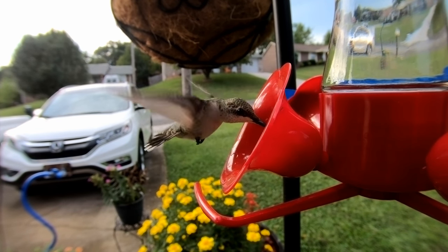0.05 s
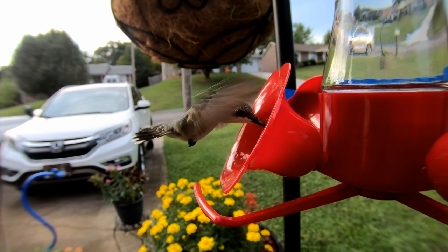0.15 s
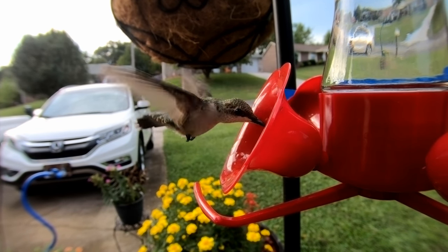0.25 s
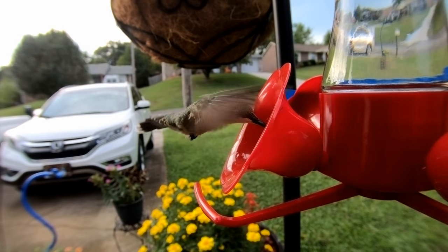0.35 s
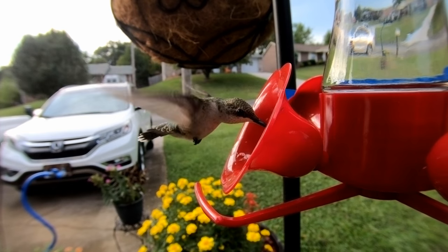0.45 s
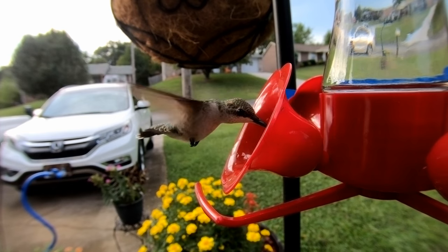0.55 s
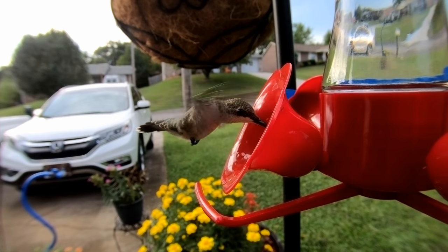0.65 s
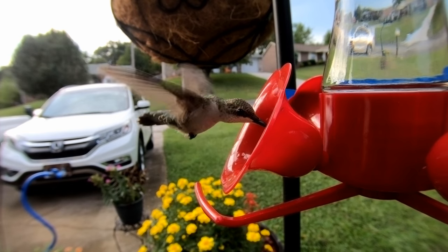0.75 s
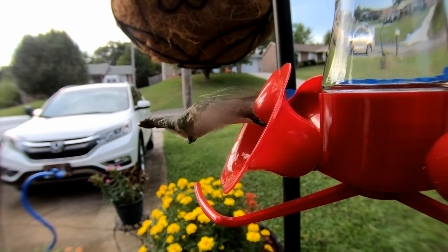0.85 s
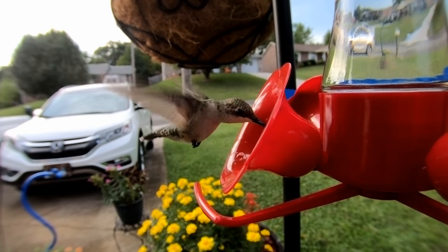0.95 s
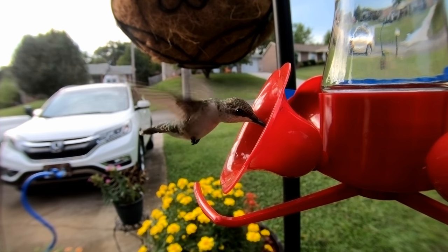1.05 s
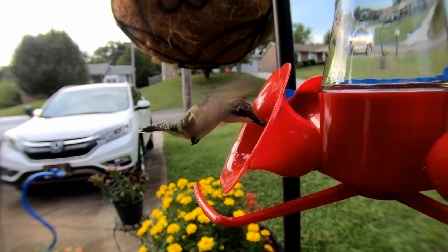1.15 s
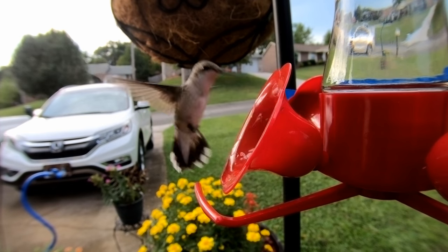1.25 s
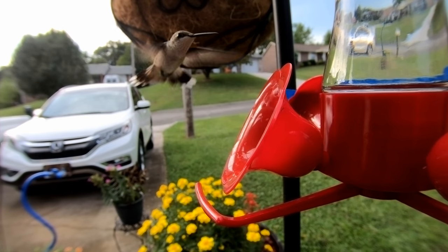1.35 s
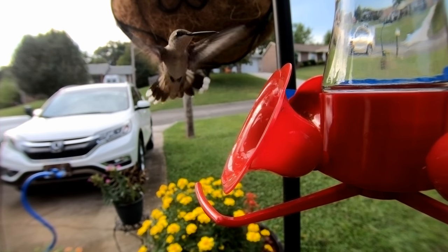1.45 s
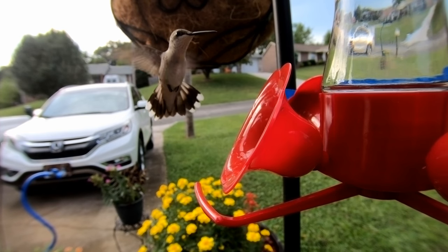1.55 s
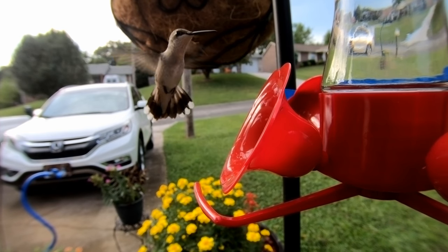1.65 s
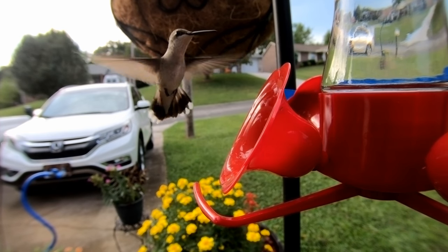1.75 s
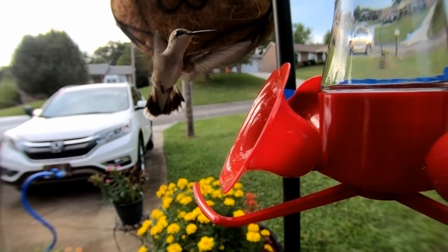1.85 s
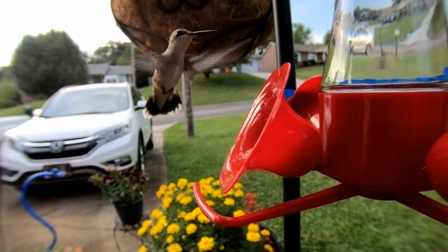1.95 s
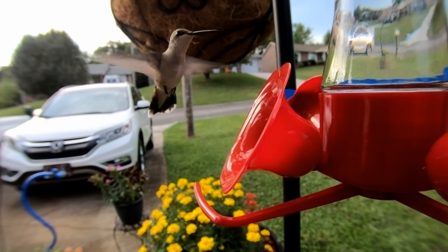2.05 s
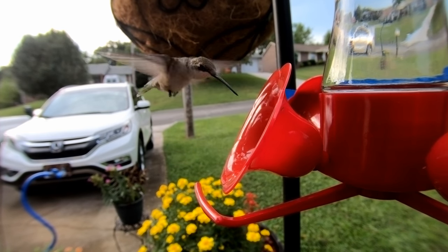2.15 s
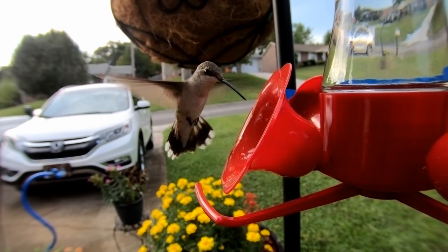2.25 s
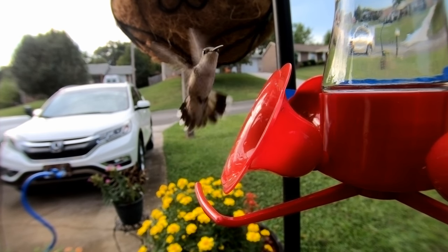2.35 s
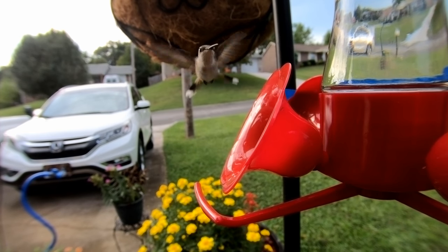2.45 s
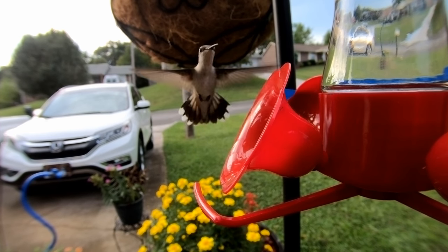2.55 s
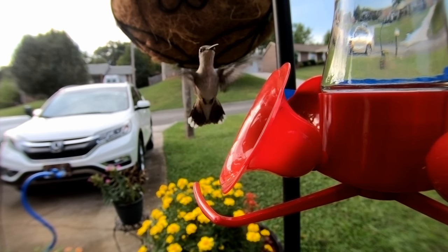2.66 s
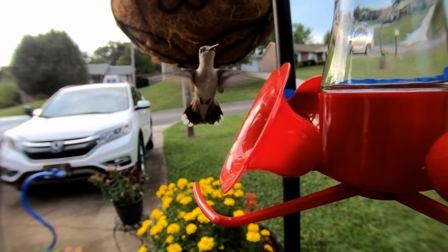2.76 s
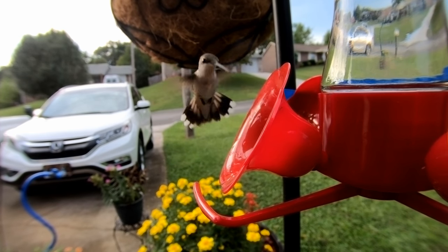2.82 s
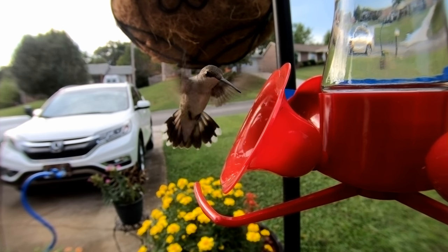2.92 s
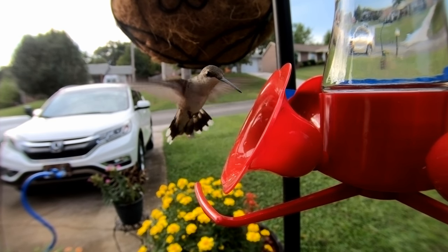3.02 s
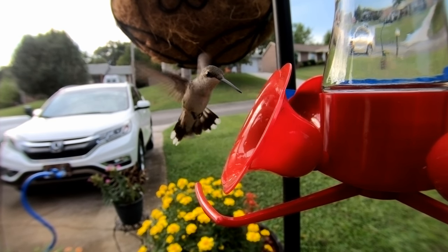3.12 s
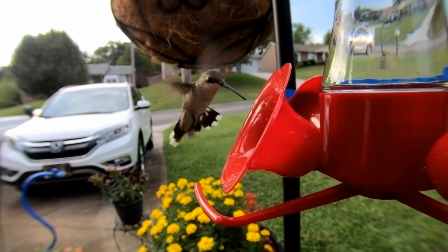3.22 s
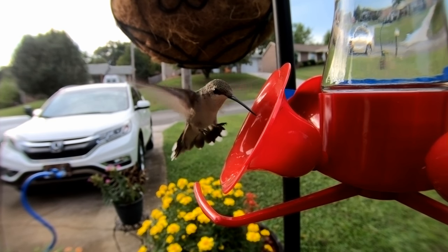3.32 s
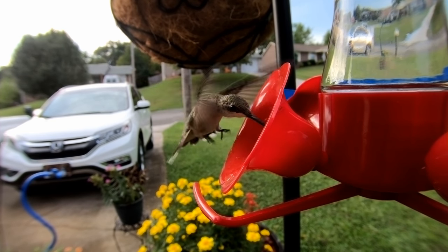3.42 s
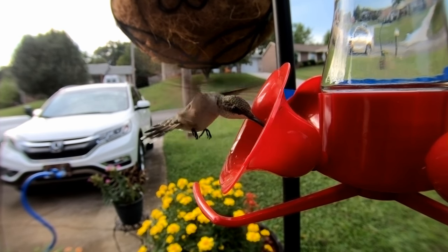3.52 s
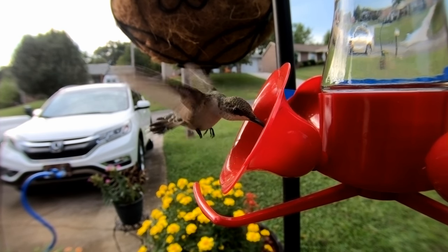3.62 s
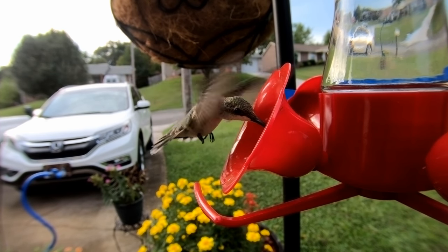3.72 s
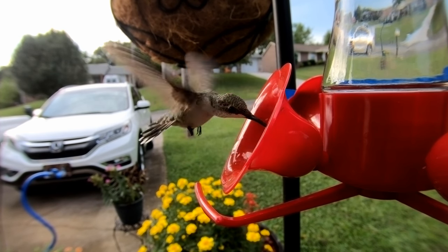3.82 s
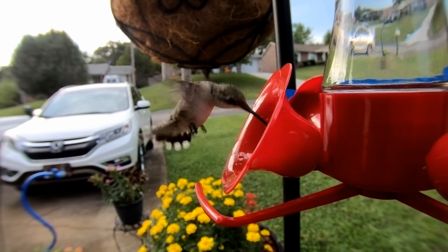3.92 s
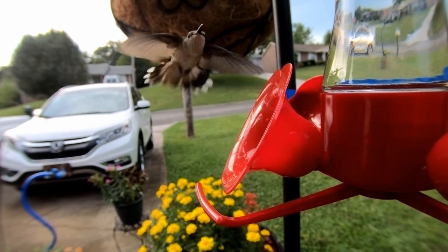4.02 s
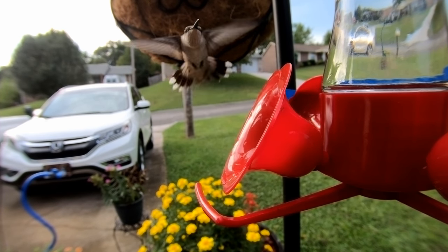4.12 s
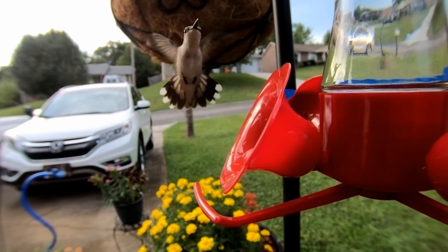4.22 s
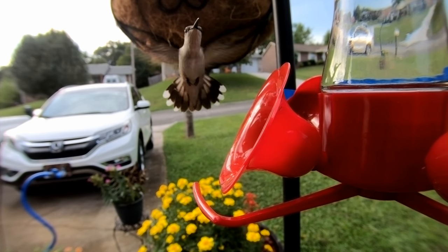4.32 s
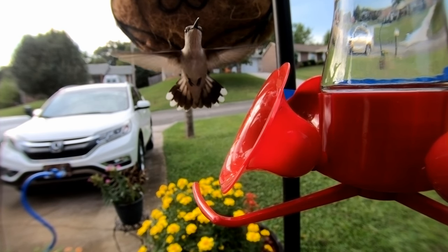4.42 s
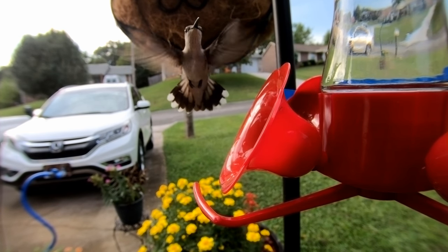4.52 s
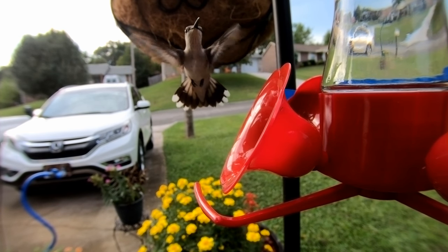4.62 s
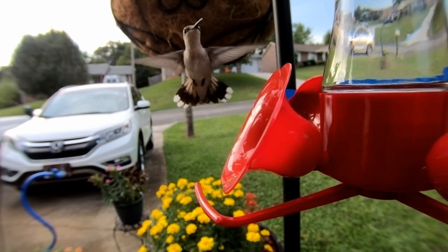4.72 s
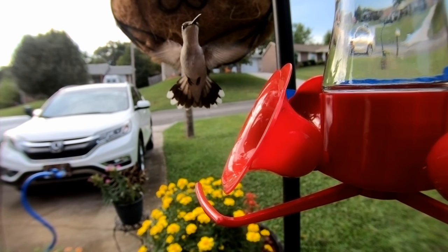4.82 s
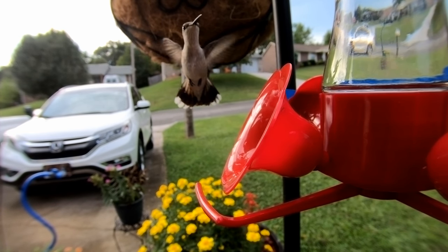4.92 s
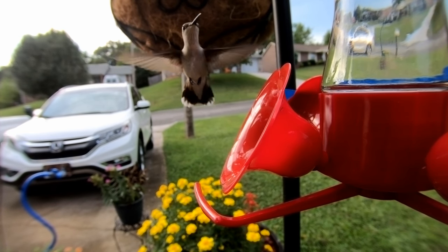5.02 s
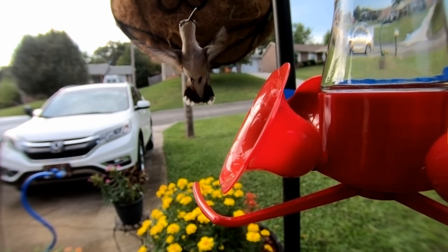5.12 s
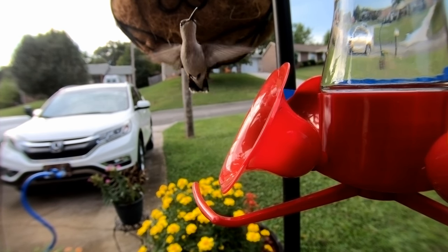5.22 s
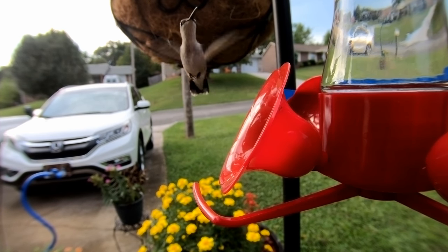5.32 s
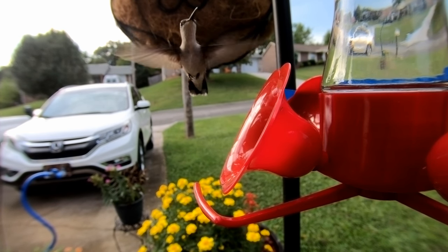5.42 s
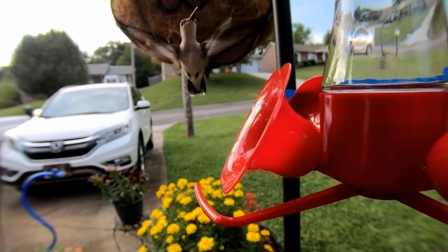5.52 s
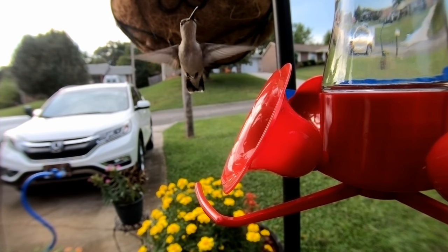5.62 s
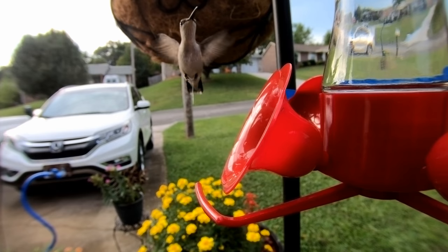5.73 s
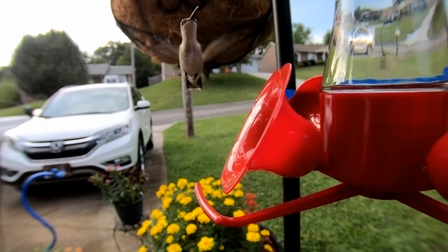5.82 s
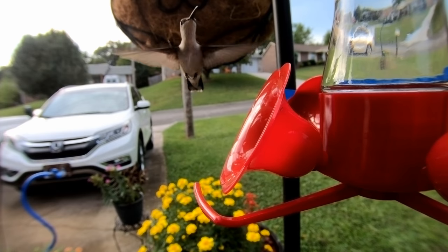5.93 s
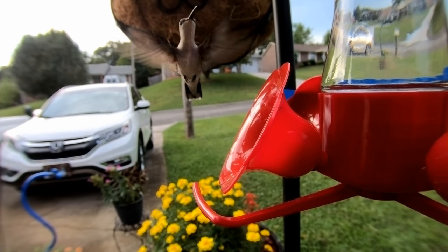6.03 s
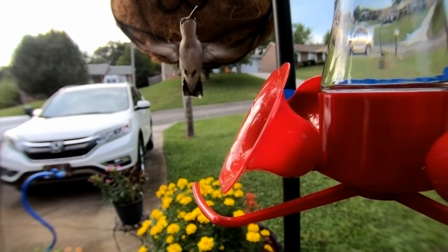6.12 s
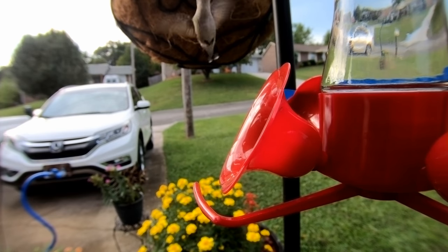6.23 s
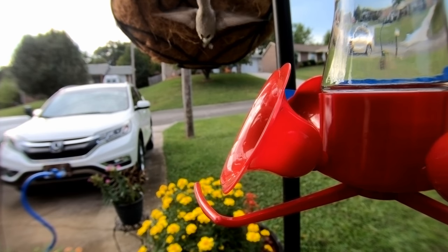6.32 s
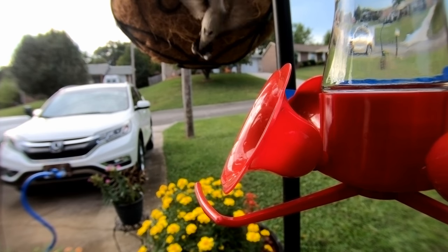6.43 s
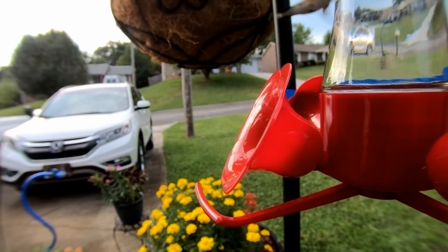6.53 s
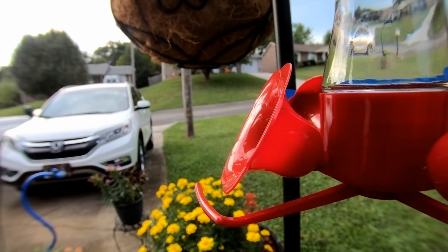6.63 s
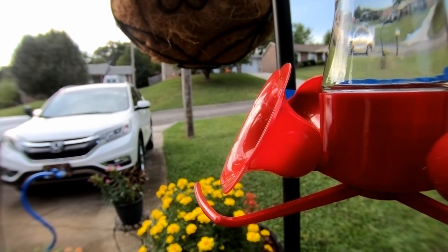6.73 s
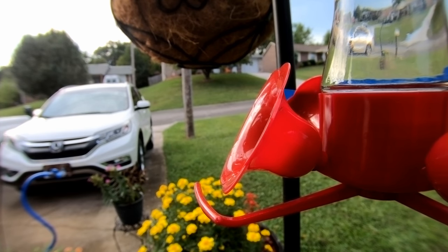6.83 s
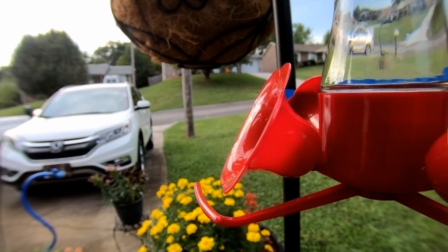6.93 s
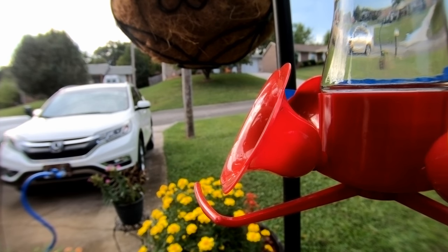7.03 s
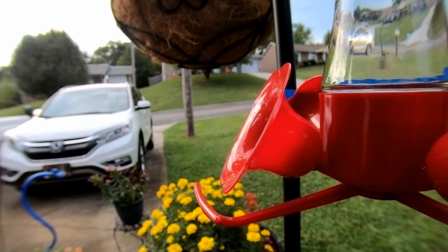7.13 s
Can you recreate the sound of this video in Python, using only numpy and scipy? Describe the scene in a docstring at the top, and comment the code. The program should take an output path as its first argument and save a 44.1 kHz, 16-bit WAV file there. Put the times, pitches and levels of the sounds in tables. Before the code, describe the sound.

A hummingbird's wings hum low and fluttering from the start, a hand's width from the microphone, with a soft pulsing swish. The hum is steady and slightly rough while the bird feeds, then surges louder and higher as it darts at about 1.3, 2.1, 2.4, 3.1, 4.1 and 6.3 seconds, mostly dipping briefly afterwards. It gives faint, thin rising chips around 0.7, 1.1, 2.3 and 4.9 seconds. Wing air softly buffets the microphone near 2.1 and 6.6 seconds. From about 6.2 seconds feathers lightly brush, bump and scrape a fibre basket. The hum dies away quickly just after 6.7 seconds, leaving a faint rustle. Far quieter throughout is the open garden: distant traffic, a steady high insect chorus, a far bird's repeated call and small scattered peeps. A distant dog gives one short woof at about 4.9 seconds.

```python
"""The hum of a hummingbird's wings at a garden feeder, a hand's width from a stereo microphone.
Every wingbeat is a pressure pulse with a swish. The bird sips, gives a few thin chips and darts back
and forth, its downwash buffeting the microphone; on the way out its feathers brush a fibre basket.
Farther off: insects, traffic, a bird's repeated call, small peeps and one distant woof."""
import sys
import numpy as np
from scipy import signal
from scipy.fft import rfft, irfft, next_fast_len
from scipy.io import wavfile
from scipy.ndimage import uniform_filter1d, map_coordinates

SR = 44100
rng = np.random.default_rng(int(sys.argv[2]) if len(sys.argv) > 2 else 0)


def to_wav(sig):
    """Store sig (one row per channel, or 1-D mono) as 16-bit WAV at the path in sys.argv[1].

    Samples outside -1..1 are clipped; the rate is SR.
    """
    pcm = np.clip(np.atleast_2d(sig), -1, 1) * 32767
    pcm = np.round(pcm).astype(np.int16)
    wavfile.write(sys.argv[1], SR, pcm.T)  # frames by channels


N = 316197

# steady hovering close to the microphone: time_s, beat_hz, level_db
HOVER = [(0.0, 44.82, -17.3), (0.26, 46.15, -19.2), (0.5, 43.73, -19.5), (0.84, 44.25, -19.5),
         (1.27, 42.53, -18.5), (1.62, 44.56, -15.3), (1.77, 41.11, -16.8), (2.05, 42.3, -18.7),
         (2.28, 45.6, -14.1), (2.62, 43.46, -19.0), (2.9, 39.68, -19.8), (3.35, 42.74, -17.5),
         (3.53, 47.88, -14.2), (3.95, 45.37, -17.7), (4.55, 40.84, -15.9), (5.3, 42.78, -17.9),
         (6.15, 41.23, -17.4), (6.59, 44.18, -21.4)]
# how far the bird lies flat with its bill in the feeder: time_s, feeding (0-1)
FEEDING = [(0, 0.94), (1.2, 1), (1.6, 0.3), (2.5, 0.3), (3.2, 0.3), (3.7, 0.9), (4.3, 0.01)]
# a burst of effort, then a coasting lull: peak_s, effort (1 = hard dart), lull_delay_s, lull_depth_db
DARTS = [(1.347, 0.79, 0.166, 9.6), (2.109, 0.67, 0.154, 4.9), (2.431, 0.88, 0.098, 15.2),
         (3.06, 0.71, 0.1, 0.0), (3.428, 0.41, 0.058, 0.7), (4.078, 1.22, 0.112, 8.7),
         (6.274, 0.78, 0.096, 15.4), (6.544, 0.46, 0.07, 0.4)]
# air tearing off the feathers: frequency_hz, density_db
SWISH_SPECTRUM = [(60, -8.5), (150, 0.5), (300, -6), (500, -14), (800, -18.5), (1500, -30), (3000, -34.5),
                  (7000, -44), (9000, -54), (15000, -70.5)]
# eddies stirred by the wings: frequency_hz, density_db
EDDY_SPECTRUM = [(40, -25.5), (70, 3.5), (120, 1.5), (170, -15), (300, -37), (900, -81)]
# open garden air with far traffic: frequency_hz, density_db
GARDEN_SPECTRUM = [(20, 12.5), (60, 16.5), (150, 8.5), (300, -7), (700, -8), (1300, -12), (2000, -19.5),
                   (2600, -25), (4500, -25.5), (7000, -36.5), (8300, -42), (11000, -42.5), (15000, -53.5)]
# the insect chorus all around: frequency_hz, density_db
INSECT_SPECTRUM = [(2000, -44.5), (2700, -10), (3400, 1.5), (4300, -6), (4900, -1.5), (5700, -4),
                   (6300, -2), (6800, 4), (7200, -2), (7600, -8.5), (8200, -28), (11000, -55)]
# stacked notes of the far bird's call: delay_s, pitch_hz, level_db, length_s
CALL_NOTES = [(0, 3875, 1, .075), (.03, 3700, -1, .17), (.03, 3300, -2.5, .18), (.02, 4080, -6, .14),
              (.04, 2920, -8, .15)]
# the clearest peeps across the garden: peak_s, level_db, pitch_hz
PEEPS = [(.19, -60, 2740), (.35, -59.5, 2550), (.412, -52.5, 1530), (.5, -51.5, 930), (.81, -51, 1000),
         (.998, -47, 1010), (1.67, -51, 954), (1.79, -54.5, 2000), (1.975, -51, 3190), (2.328, -55.5, 2030),
         (2.365, -52.5, 1650), (3.226, -53.5, 3020), (3.49, -58.5, 3400), (3.557, -54.5, 3250),
         (3.665, -54, 1900), (3.715, -56.5, 2900), (4.338, -63, 2010), (5.1, -51.5, 1510),
         (5.472, -50.5, 2060)]
# feathers brushing and flicking close by: start_s, level_db, centre_hz, t60_s
BRUSHES = [(0.677, -54, 2200, 0.2), (0.793, -51, 1200, 0.23), (1.089, -54, 2000, 0.12),
           (2.075, -51, 1800, 0.48), (2.572, -59, 2480, 0.073), (4.034, -55.5, 2000, 0.058),
           (4.209, -52.5, 1570, 0.12), (5.138, -49.5, 1700, 0.12), (5.988, -49.5, 1500, .08),
           (6.191, -40, 3500, 0.062), (6.219, -48.5, 4800, 0.13), (6.323, -46.5, 2510, 0.13),
           (6.377, -48, 6600, 0.08), (6.495, -38, 3850, 0.077), (6.522, -48.5, 3070, 0.17),
           (6.573, -47, 1020, 0.067), (6.649, -41, 2360, 0.053), (6.707, -43, 3800, 0.086),
           (6.831, -56, 2450, 0.27), (6.898, -54, 4020, 0.079), (7.0, -46.5, 1600, 0.14)]
# the colour shared by those brushes: frequency_hz, gain_db
BRUSH_COLOUR = [(20, 21), (7000, -7), (8400, -30), (12000, -31), (15000, -44)]
# the hummingbird's rising chips: start_s, level_db, start_hz, end_hz
CHIPS = [(.724, -49.5, 5385, 6900), (1.09, -53.5, 4920, 6200), (2.251, -51.5, 5570, 6500),
         (4.949, -46.5, 5300, 7426)]
# downwash hitting the microphone: peak_s, level_db, width_s
GUSTS = [(2.112, -25, 0.046), (2.19, -27.5, 0.059), (6.578, -29, 0.036), (6.675, -23.5, 0.042)]
# leaves and fibre rustling as the bird leaves: time_s, level_db
RUSTLE = [(6.1, -82.5), (6.5, -59), (6.8, -66), (6.87, -55), (7.02, -60.5), (7.17, -59.5)]
# the colour of that rustle: frequency_hz, density_db
LEAF_SPECTRUM = [(200, -1.5), (900, -0.5), (2200, 0.5), (3200, -5.5), (6500, -8.5), (8000, -23),
                 (14000, -34.5)]
# the bird bumping the basket: peak_s, level_db, centre_hz
BUMPS = [(6.526, -48, 3231), (6.578, -36.5, 480), (6.581, -43, 1390), (6.653, -44, 1960)]
# wing tips scraping along the basket: peak_s, level_db, width_s
SCRAPES = [(6.56, -52, .018), (6.625, -45.5, .022), (6.688, -47, 0.012), (6.73, -43.5, 0.014)]
# scraped basket fibre: frequency_hz, density_db
FIBRE_SPECTRUM = [(300, 2), (1500, -8.5), (4000, -4.5), (6400, 6), (7300, -4.5), (8300, -13.5),
                  (12000, -27), (15000, -38.5)]
# the tail from houses and trees: frequency_hz, t60_s
YARD_DECAY = [(200, 0.55), (2000, 0.34), (9000, .15)]
# left-right likeness of the open air: frequency_hz, coherence (0-1)
COHERENCE = [(50, 0.97), (150, 0.97), (300, 0.64), (600, 0.74), (1200, 0.32), (2200, 0.23), (4000, 0.19),
             (8000, 0.14)]
# balance of the two microphone ports: frequency_hz, left_minus_right_db
PORT_BALANCE = [(50, 0.1), (130, 0), (300, -1.5), (650, -2), (1300, 2.5), (2600, -0.5), (3800, 3.5),
                (6000, -9.5), (7200, -9), (9000, -1)]
# phase of the left port against the right: frequency_hz, lead_rad
PORT_LEAD = [(40, 0), (130, -.09), (260, -.2), (520, 0.5), (860, 1.16), (1460, 1.53), (1900, 1.16),
             (3200, 0.5), (4900, 1), (6900, 4.5)]

EASY_HZ, EASY_DB = 41, -17  # beat rate and level of an easy stroke


def amp(db):
    """Decibels to gain."""
    return 10 ** (np.asarray(db) / 20)


def unit(x):
    """Scale to rms 1."""
    return x / np.sqrt(np.mean(x ** 2) + 1e-20)


def along(points, hz):
    """Interpolate (frequency_hz, value) points on a log axis."""
    f, v = np.transpose(points)
    return np.interp(np.log(hz + 1), np.log(f + 1), v)


def curves(rows):
    """One value per sample for each column after the time."""
    times, *columns = np.transpose(rows)
    return [np.interp(np.arange(N) / SR, times, column) for column in columns]


def wobble(knot_hz):
    """A smooth random curve over the whole scene."""
    knots = rng.standard_normal(int(N * knot_hz / SR) + 4)
    return map_coordinates(knots, [np.arange(N) * knot_hz / SR])


def waver(size, knots=8):
    """A smooth random bend over one note."""
    return map_coordinates(rng.standard_normal(knots), [np.linspace(0, knots - 1, size)])


def arch(length_s):
    """A smooth rise and fall."""
    return np.hanning(int(length_s * SR))


def swell(peak_s, rise_s, fall_s):
    """A bell curve in time."""
    t = np.arange(N) / SR - peak_s
    return np.exp(-.5 * (t / np.where(t < 0, rise_s, fall_s)) ** 2)


def swells(rows):
    """The summed envelope of (peak_s, level_db, width_s) rows."""
    return sum(amp(db) * swell(s, width, width) for s, db, width in rows)


def add(track, start_s, sound):
    """Mix a sound into a track."""
    i = int(round(start_s * SR))
    part = sound[..., max(-i, 0):N - i]
    track[..., max(i, 0):max(i, 0) + part.shape[-1]] += part


def filtered(x, response):
    """Apply a gain that depends on frequency."""
    n = x.shape[-1]
    padded = next_fast_len(n + SR // 4)
    return irfft(rfft(x, padded) * response(np.fft.rfftfreq(padded, 1 / SR)), padded)[..., :n]


def band(hz, centre_hz, q):
    """The gain of one resonance."""
    return 1 / np.sqrt(1 + (q * ((hz + 1) / centre_hz - centre_hz / (hz + 1))) ** 2)


def air(response, size=N):
    """Coloured stereo noise of rms 1, alike on both sides in the bass."""
    def mid_side(hz):
        angle = np.arccos(np.clip(along(COHERENCE, hz), -1, 1)) / 2
        return response(hz) * [np.cos(angle), np.sin(angle)]
    mid, side = filtered(rng.standard_normal((2, size)), mid_side)
    return unit(np.array([mid + side, mid - side]))


def rush(spectrum):
    """Stereo noise shaped by (frequency_hz, density_db) points."""
    return air(lambda hz: amp(along(spectrum, hz)))


def patchy(x, depth_db):
    """Random swells, each a few hundred Hz wide and some tens of ms long."""
    spectra = signal.stft(x, nperseg=512)[2]
    field = rng.standard_normal(spectra.shape[1:])
    field = uniform_filter1d(uniform_filter1d(field, 5, axis=0), 8, axis=1)
    return signal.istft(spectra * amp(depth_db * unit(field)), nperseg=512)[1][:, :N]


def blurred_notes(rows, length_s, q):
    """Each note is noise in a narrow resonance that swells and fades."""
    out, shape = np.zeros((2, N)), arch(length_s)
    for peak_s, db, centre_hz in rows:
        ring = air(lambda hz: band(hz, centre_hz, q) ** 2, size=len(shape))
        add(out, peak_s - length_s / 2, amp(db) * shape * ring)
    return out


def flight(dart_hz=6.76, dart_db=7.0, sag_hz_per_db=.378, leave_s=6.71, leave_db_per_s=162):
    """Effort lifts beat rate, level and thrust; a lull slows and weakens the beat; leaving fades it."""
    hover_hz, hover_db = curves(HOVER)
    effort = sum(size * swell(s, rise_s=.036, fall_s=.027) for s, size, _, _ in DARTS)
    lull_db = sum(depth * swell(s + delay, .042, .042) for s, _, delay, depth in DARTS)
    away_db = leave_db_per_s * np.maximum(np.arange(N) / SR - leave_s, 0)
    beat_hz = hover_hz + dart_hz * effort - sag_hz_per_db * lull_db
    sweep = np.tanh(effort / .72)  # the stroke widens until the wings reach full sweep
    level_db = hover_db + dart_db * sweep - lull_db - away_db
    thrust = .029 + .045 * (hover_hz - EASY_HZ) + .47 * sweep
    return beat_hz, level_db, thrust


def wing_hum(cycles, beat_hz, level_db, thrust, feeding):
    """Each downstroke is a suction pulse, with a push of thrust before it and a weaker upstroke after."""
    beats = np.flatnonzero(np.diff(np.floor(cycles + .5)))
    t = np.arange(-SR // 20, SR // 20) / SR
    bell = lambda centre_s, width_s: np.exp(-.5 * ((t - centre_s) / width_s) ** 2)
    hum = np.zeros(N)
    for i in beats:
        # suction sets in abruptly and lets go more slowly; thrust and a flat posture make it crisper
        crisp = 1 + .9 * feeding[i] + 1.8 * thrust[i]
        rise_s = .0037 * crisp ** .27 * np.exp(rng.normal(0, .01))
        age = np.maximum(1 + t / rise_s, 0)
        down = -(age * np.exp(1 - age)) ** (3 * crisp)
        push = rng.normal(.85 * thrust[i], .1) * bell(-.005, .0015)
        up_strength = (.12 + .23 * feeding[i]) * rng.normal(1, .6)
        up = -up_strength * bell(rng.normal(.696, .046) / beat_hz[i], .0024)
        # holding the bill in the feeder makes the strokes less even
        slip_s = rng.normal(0, .00031 * feeding[i])
        stroke_db = rng.normal(level_db[i] + 1.92, 1 + 1.2 * feeding[i])
        wake = rng.normal(.12 * (1 - feeding[i]), .08) * bell(.0105, .003)
        add(hum, i / SR + t[0] + slip_s, amp(stroke_db) * (down + push + up + wake))
    return filtered(hum, lambda hz: (1 - np.exp(-(hz / 31) ** 6)) / (1 + (hz / 700) ** 4))


def wing_swish(cycles, level_db, thrust, feeding):
    """Air tears off the feathers as each downstroke starts: more in a dart, less when lying flat."""
    pulsing = unit(amp(3 * np.cos(2 * np.pi * (cycles - .42))))
    dart_db = np.maximum(level_db + 14, 0)
    swish_db = -47.5 + .73 * (level_db - EASY_DB) - feeding + 4.8 * thrust + dart_db
    return amp(swish_db) * pulsing * rush(SWISH_SPECTRUM)


def wings():
    """Hum, swish and eddies from a hand's width away; the eddies roughen the hum most at the feeder."""
    feeding, = curves(FEEDING)
    beat_hz, level_db, thrust = flight()
    cycles = np.cumsum(beat_hz) / SR + .012 * wobble(12)  # strokes drift ahead and behind
    hum = wing_hum(cycles, beat_hz, level_db, thrust, feeding)
    # the two microphone ports hear the near wing a little differently
    spread = amp(-25.5) * unit(wobble(.94)) * np.gradient(hum) * SR / (2 * np.pi * 70)
    swish = wing_swish(cycles, level_db, thrust, feeding)
    eddies = amp(level_db - 23.5 + 6.5 * feeding) * rush(EDDY_SPECTRUM)
    drone = np.array([hum + spread, hum - spread]) + eddies
    # the feeder stands to the right: overtones and swish lean that way while the bird sips
    overtones = filtered(drone, lambda hz: hz / (hz + 250))
    lean = np.outer([-1, 1], .66 * feeding) * overtones
    swish_pan = amp(np.outer([-.5, .5], 2.8 * feeding - .6))
    return drone + lean + swish * swish_pan


def garden_air():
    """Open air with far traffic, drifting gently in level."""
    return amp(-44 + .9 * wobble(3)) * patchy(rush(GARDEN_SPECTRUM), depth_db=3.5)


def insects():
    """A steady, faintly shimmering chorus around the garden."""
    return amp(-61.5 + .67 * wobble(13)) * patchy(rush(INSECT_SPECTRUM), depth_db=2)


def whistle(pitch_hz, length_s, quaver_hz=13):
    """One pure note that quavers a little."""
    shape = arch(length_s) ** .5
    hz = rng.normal(pitch_hz, quaver_hz) + quaver_hz * waver(len(shape))
    return shape * np.sin(2 * np.pi * np.cumsum(hz) / SR)


def far_birds(call_db=-65, gap_s=.955, hurry_s=.031, answer_db=-68.5, answer_gap_s=.79):
    """Far off, a call of stacked notes comes round ever sooner; one note answers at an even pace."""
    out = np.zeros(N)
    for k in range(8):
        start_s = -.06 + k * gap_s - hurry_s * k * (k - 1) / 2
        for delay_s, pitch_hz, note_db, length_s in CALL_NOTES:
            add(out, start_s + delay_s, amp(call_db + note_db) * whistle(pitch_hz, length_s))
    for k in range(5):
        add(out, 1.46 + k * answer_gap_s, amp(answer_db) * whistle(pitch_hz=3700, length_s=.11))
    return out


def peeps(faint_db=-58.5, faint_hz=2730, faint_until_s=4.4):
    """Small peeps across the garden, with four faint ones scattered in time and over an octave."""
    faint = [(faint_until_s * when, faint_db, faint_hz * 2 ** (octave - .5))
             for when, octave in rng.random((4, 2))]
    return blurred_notes(PEEPS + faint, length_s=.04, q=4.5)


def feathers(attack_s=.002, grain_db=3):
    """Close, grainy brushes, a longer scrape along the basket, and a rustle that lingers."""
    brushes = np.zeros((2, N))
    t = np.arange(SR // 3) / SR
    for start_s, db, centre_hz, t60_s in BRUSHES:
        hiss = air(lambda hz: band(hz, centre_hz, q=1.3) * amp(along(BRUSH_COLOUR, hz)), size=len(t))
        envelope = amp(db + 4.5 - 60 * t / t60_s) * (1 - np.exp(-t / attack_s))
        add(brushes, start_s - attack_s, hiss * envelope)
    catch_and_slip = unit(amp(4.5 * wobble(120)))
    scrape = swells(SCRAPES) * catch_and_slip * rush(FIBRE_SPECTRUM)
    rustle = amp(curves(RUSTLE)[0]) * rush(LEAF_SPECTRUM)
    return (brushes + scrape + rustle) * unit(amp(grain_db * wobble(700)))


def chips(length_s=.024, bend_s=.0085):
    """The hummingbird's voice close up: a thin, slightly hoarse note sweeps up and levels off."""
    out, shape = np.zeros(N), arch(length_s) ** .52
    t = np.arange(len(shape)) / SR
    for start_s, db, start_hz, end_hz in CHIPS:
        hoarse_hz = 220 * unit(uniform_filter1d(rng.standard_normal(len(t)), size=50))
        hz = end_hz + (start_hz - end_hz) * np.exp(-np.maximum(t - .003, 0) / bend_s) + hoarse_hz
        add(out, start_s - .002, amp(db) * shape * np.sin(2 * np.pi * np.cumsum(hz) / SR))
    return out


def downwash():
    """Puffs of wing air buffet the microphone as the bird darts past."""
    rumble = rush([(12, -16), (30, 4.5), (60, 2), (110, -20), (250, -24), (700, -38), (3000, -81)])
    return swells(GUSTS) * rumble


def woof(start_s=4.868, length_s=.088, pitch_hz=178, voice_db=-34.5, rasp_db=-37.5):
    """A distant dog: a short rough bark of which only the low throat resonances carry."""
    out, shape = np.zeros((2, N)), arch(length_s)
    hz = pitch_hz * (.95 + .07 * shape + .035 * waver(len(shape)))
    phase = 2 * np.pi * np.cumsum(hz) / SR
    voice = np.sin(2 * phase) + amp(-8) * np.sin(3 * phase)
    rasp = air(lambda f: band(f, centre_hz=420, q=2.5) ** 3, size=len(shape))
    add(out, start_s, shape * (amp(voice_db) * voice + amp(rasp_db) * rasp))
    return out


def basket_bumps():
    """The bird knocks against the basket as it leaves."""
    return blurred_notes(BUMPS, length_s=.024, q=3)


def yard_echo(x):
    """Houses and trees return a short diffuse tail."""
    hz, t, spectra = signal.stft(rng.standard_normal((2, SR // 2)), SR, nperseg=256)
    decay = amp(-60 * t / along(YARD_DECAY, hz)[:, None])
    tail = signal.istft(spectra * decay, SR, nperseg=256)[1]
    return signal.fftconvolve(x, tail / np.linalg.norm(tail[0]), axes=1)[:, :N]


def scene():
    """The bird close to the microphone, the garden behind."""
    bumps, garden_peeps = basket_bumps(), peeps()
    near = feathers() + chips() + bumps
    far = garden_peeps + far_birds() + woof()
    direct = wings() + downwash() + near + far
    return direct + yard_echo(amp(-9) * near + amp(-7.5) * far) + garden_air() + insects()


def record(dry):
    """The two microphone ports differ in colour and phase; nothing is kept above 14.5 kHz."""
    def ports(hz):
        colour = amp(np.outer([.5, -.5], along(PORT_BALANCE, hz)))
        phase = np.exp(np.outer([.5j, -.5j], along(PORT_LEAD, hz)))
        return colour * phase * (hz < 14500)
    return filtered(dry, ports)


dry = scene()
out = record(dry)
to_wav(out)
```